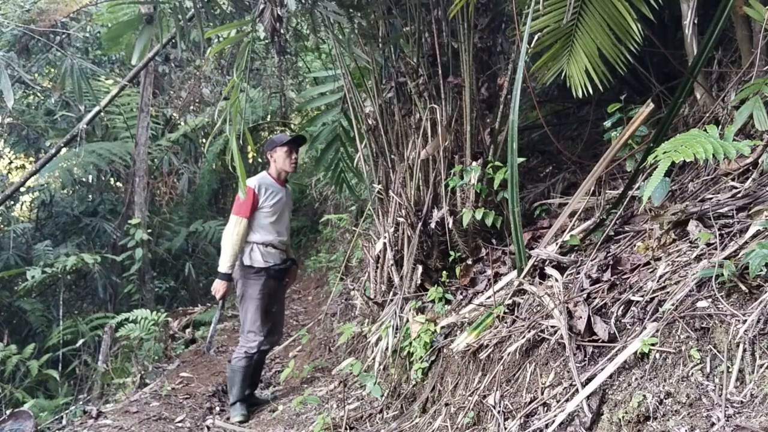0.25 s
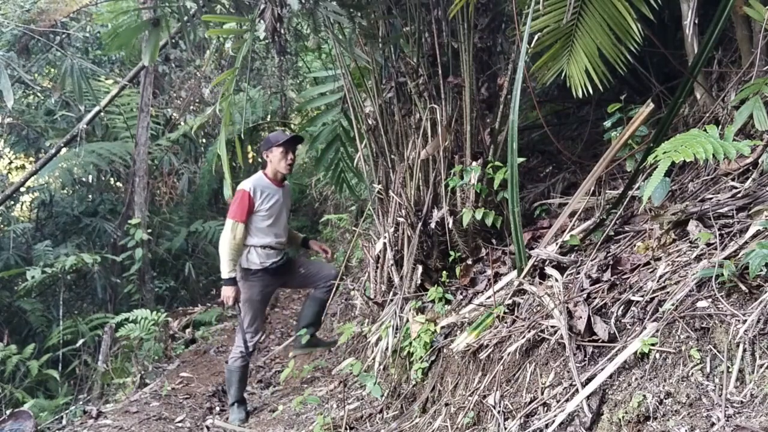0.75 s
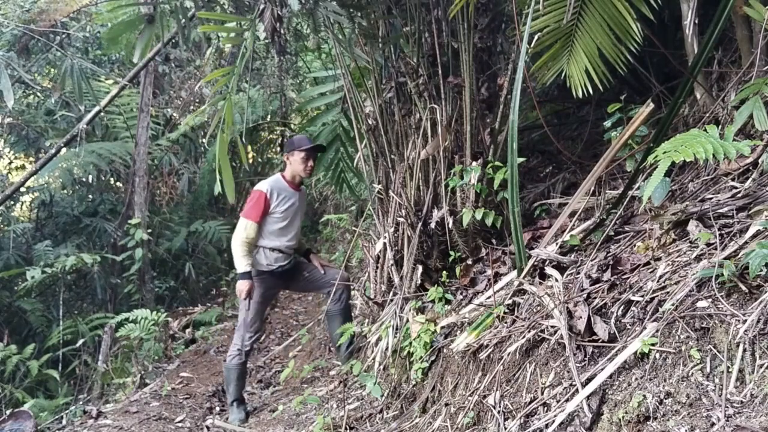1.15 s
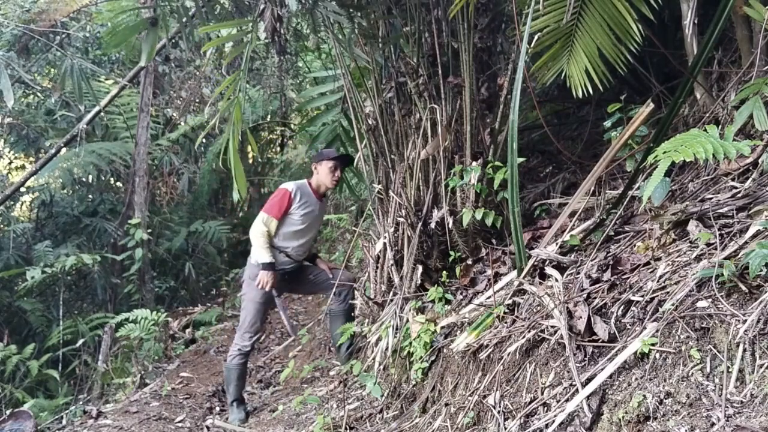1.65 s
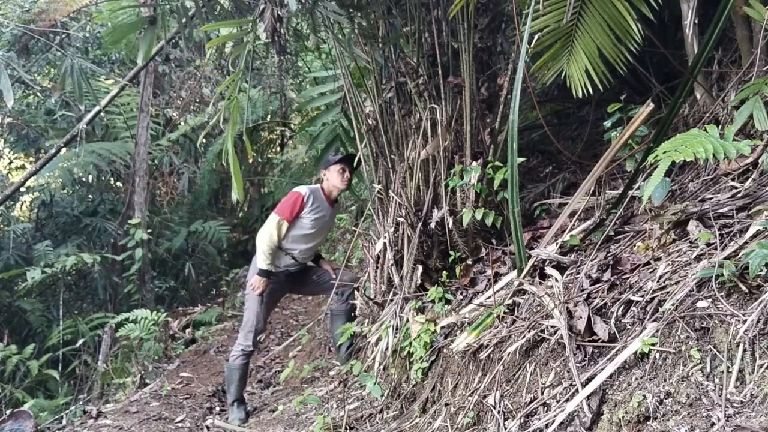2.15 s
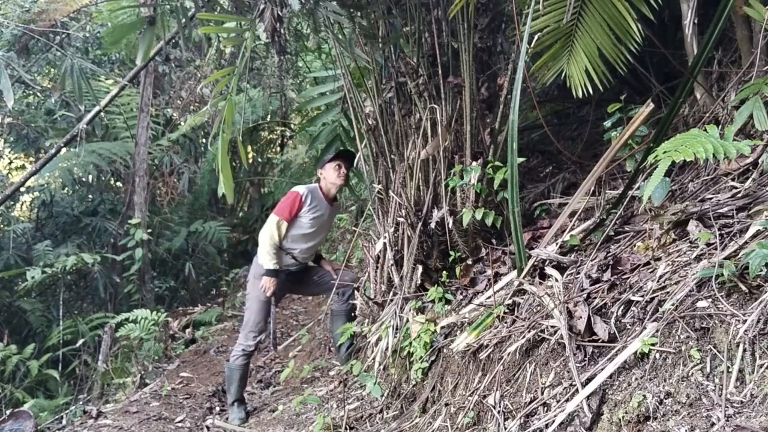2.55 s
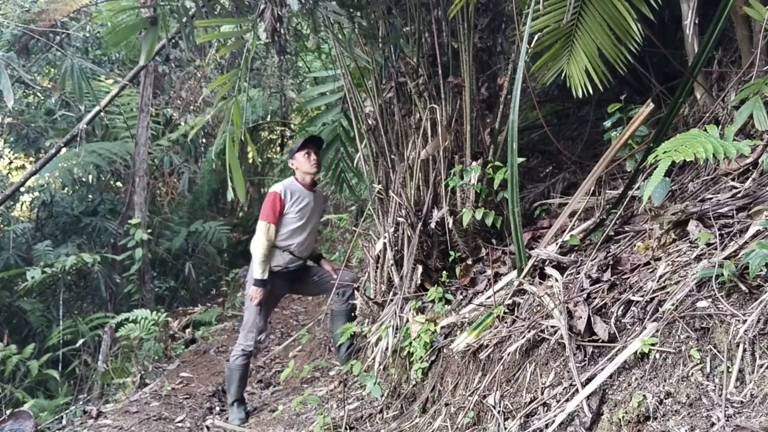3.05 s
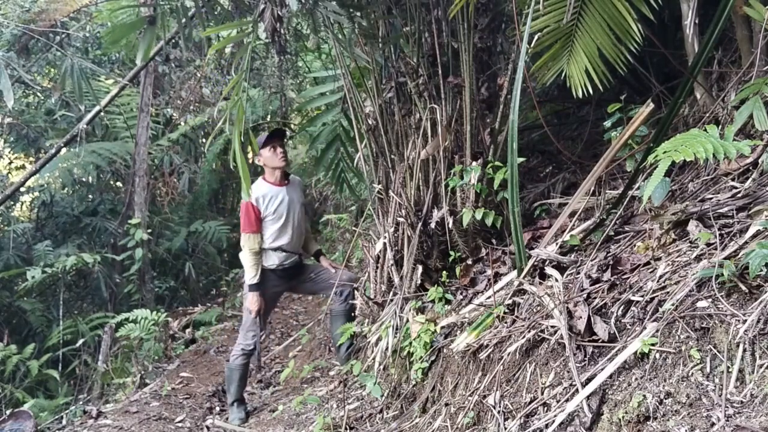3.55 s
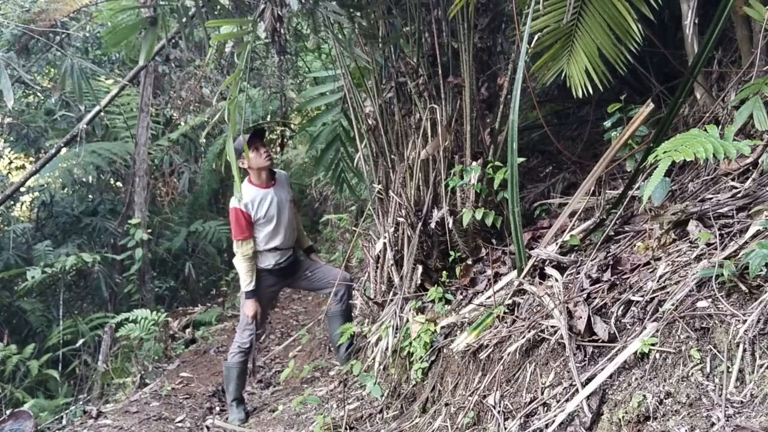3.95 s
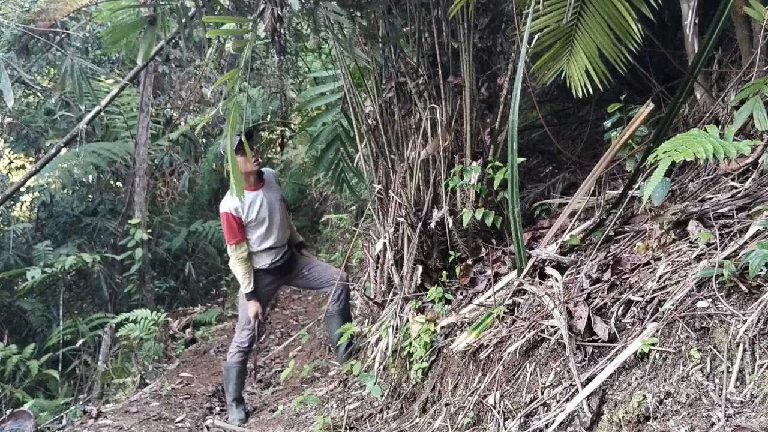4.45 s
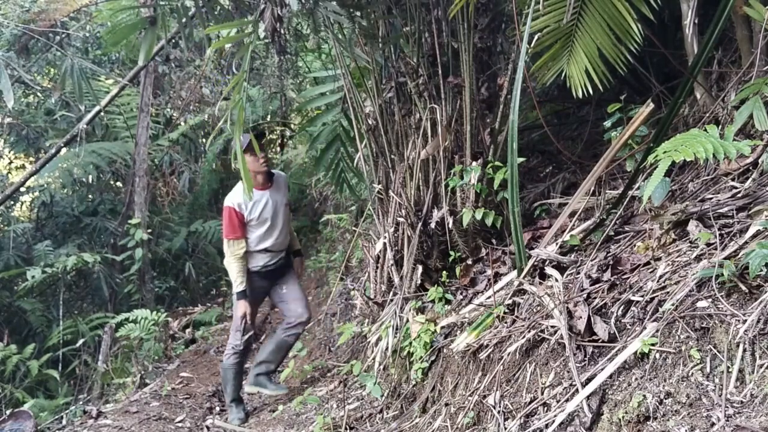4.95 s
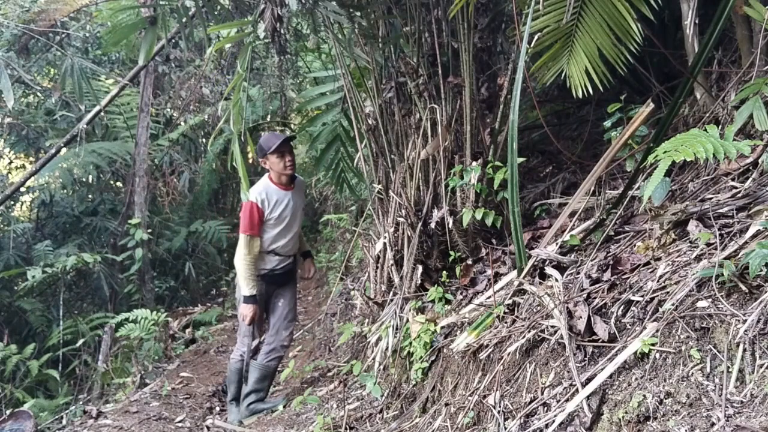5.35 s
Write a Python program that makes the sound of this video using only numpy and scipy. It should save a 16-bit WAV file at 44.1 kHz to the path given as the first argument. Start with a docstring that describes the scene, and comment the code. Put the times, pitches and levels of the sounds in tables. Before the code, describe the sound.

Shrill cicadas fill a forest while one whines up and drones every two seconds; a boot crunches sharply through dry leaves and cane.

```python
"""Close snaps and rustles come first, over a high chorus: a few metres away someone steps up onto dry leaves and cane.
On this forest slope one cicada hums and swells into a rising whine about every two seconds; later come the steps down.
Cicadas are harmonics of a moving tymbal rate, the chorus noise bands and tones, the litter filtered grains and bursts.
Trunks scatter the cicada, steps and small callers as noise echoes; light air rumbles on the microphone."""
import sys
import numpy as np
from scipy import signal
from scipy.fft import rfft, irfft
from scipy.io import wavfile

SR = 44100
rng = np.random.default_rng(int(sys.argv[2]) if len(sys.argv) > 2 else 0)


def inscribe(sig):
    """Save sig as 16-bit PCM at rate SR to the path in sys.argv[1].

    A 1-D sig is mono; a 2-D sig holds one channel per row.
    Samples are clipped to [-1, 1] before scaling.
    """
    pcm = np.round(np.clip(np.atleast_2d(sig).T, -1, 1) * 32767)
    wavfile.write(sys.argv[1], SR, pcm.astype(np.int16))


N = 247842

# cicada phrases: [start t/s, whine length/s, end t/s, whine level/dB before its swell,
# level/dB as the closing drone starts, drone swell/(dB per s)]
CICADA_PHRASES = [(0.716, .41, 1.53, -56, -69.5, 0), (2.801, .42, 3.76, -56, -68.5, 15),
                  (4.929, .44, 5.8, -55.5, -61, -22)]
# broad shrill of the chorus, before a fixed lift: [t/s, level/dB]
SHRILL_LEVEL = [(0.0, -60), (0.95, -62), (1.28, -57), (1.99, -61), (2.49, -60), (5.62, -60)]
# far, high hiss of small insects, before a fixed lift: [t/s, level/dB]
SIZZLE_LEVEL = [(0.0, -63.5), (0.51, -55.5), (0.81, -65), (1.09, -61), (3.87, -69.5), (5.62, -64.5)]
# centres of tiny high chirps: [t/s]
CHIRP_TIMES = [2.08, 2.4, 3.043, 3.622, 3.92, 4.29, 4.555, 5.07, 5.38]
# two quick higher pips and a later one, centres: [t/s]
PIP_TIMES = [4.781, 4.799, 5.2]
# bouts of a second cicada's whistle, before a fixed trim: [start t/s, end t/s, level/dB]
WHISTLE_BOUTS = [(-.2, 0.487, -55.5), (0.88, 1.55, -57), (2.194, 2.94, -54.5), (3.625, 4.21, -55.5),
                 (5.02, 5.7, -55)]
# dry leaves pressed or brushed: [peak t/s, fall/s, level/dB, tilt/(dB per octave), leaf ring f/Hz, ring level/dB]
LEAF_PUSHES = [(.039, 0.023, -49, -1.5, 8150, -9), (.14, 0.63, -58, 13, 9400, -27),
               (.22, .06, -57.5, -6.5, 2980, -21), (.315, 0.036, -47, -2.5, 9300, -19),
               (.346, 0.019, -44, -5, 4230, -14), (.483, 0.031, -53.5, -8, 4130, -3),
               (.555, 0.025, -49, -4.5, 3870, -2), (.618, 0.044, -52, -2.5, 8300, -7),
               (0.676, .02, -43.5, -4, 2830, -26), (.992, 0.02, -53.5, 1, 9300, -5),
               (1.048, 0.034, -49, -7.5, 9160, -7), (1.102, 0.028, -28, -1.5, 8180, -32),
               (1.125, 0.032, -27, -2, 3440, -24), (1.178, .024, -34.5, -0.5, 8600, -12),
               (1.221, 0.016, -39.5, 2, 9550, -6), (4.615, 0.039, -48.5, 3.5, 9500, -1),
               (4.645, 0.024, -45.5, 1, 9050, -7), (4.672, 0.026, -45.5, 0, 9200, -9),
               (4.743, 0.024, -46.5, 2.5, 9300, -7), (4.77, 0.025, -51.5, 1.5, 6300, -12),
               (5.22, 0.067, -59, 7, 9000, -13), (5.579, 0.082, -55, -3, 6300, -16)]
# stems and twigs snapping: [t/s, tearing time/s, level/dB, tilt/(dB per octave)]
STEM_SNAPS = [(.0325, 0.00041, -16.5, 7.5), (.3039, .001, -32, 17), (0.3274, 0.0011, -36, 8),
              (0.3418, 0.00049, -39, -9), (.5458, 0.00051, -43, -4), (.588, .001, -42, -4),
              (0.606, .0005, -51, 3), (1.1334, 0.001, -12.5, 4), (1.1352, 0.0015, -14.5, 2.5),
              (1.148, .0003, -19, 3), (1.2106, .0004, -20.5, 1), (1.2264, 0.00067, -27, 2),
              (1.231, 0.00036, -22.5, 1.5), (1.2679, .0006, -28.5, -1), (1.434, 0.00064, -36.5, -3),
              (1.507, .0005, -41, 1), (1.527, .0006, -33.5, 15), (1.721, 0.00054, -34, -3.5),
              (1.916, 0.0021, -48, -1), (2.871, 0.0009, -43, 5), (3.022, .0006, -42.5, 2),
              (4.156, .002, -53, 2), (4.1742, 0.00068, -36.5, 5), (4.583, 0.00055, -31, 8),
              (4.5885, 0.00059, -43, 9), (4.612, .0006, -41, 2), (5.195, .0008, -42, 12)]
# boot on the soil: [t/s, decay/s, level/dB, tilt/(dB per octave)]
SOIL_BLOWS = [(.032, 0.0026, -34.5, 5), (.965, 0.084, -54.5, -5), (1.091, 0.023, -41, 2.5),
              (1.101, 0.011, -32, -6), (1.19, 0.037, -46.5, -17), (4.73, 0.035, -60, 6.5),
              (4.975, 0.016, -56, -1), (5.193, 0.013, -48.5, 4.5)]
# knocks on hollow cane: [t/s, decay/s, level/dB, tilt/(dB per octave)]
CANE_KNOCKS = [(.668, 0.011, -50, 0), (1.133, 0.0073, -37, 0)]
# resonances of the soil, width of one filter pass: [f/Hz, width/Hz, level/dB]
SOIL_MODES = [(72, 59, -9), (154.6, 86, -1), (224, 137, 2), (320, 82, -1.5), (437, 130, -0.5),
              (554, 120, -9.5), (950, 300, -25)]
# resonance of the cane, width of one filter pass: [f/Hz, width/Hz, level/dB]
CANE_MODES = [(1555, 230, 0)]
# spectrum of cracking leaves: [f/Hz, level/dB]
LEAF_SPECTRUM = [(300, -17), (800, -32), (1100, -16.5), (1300, -32), (1550, -16.5), (2150, -18), (3000, -8),
                 (5400, -6.5), (8000, -1.5), (10100, -1.5), (12000, -5.5), (15500, -8)]
# spectrum of tearing stems: [f/Hz, level/dB]
STEM_SPECTRUM = [(600, -36), (1500, -22), (2300, -27), (3200, -7.5), (5400, -11), (8200, -3), (10200, -0.5),
                 (12000, -10), (15500, -12.5)]
# spectrum of the air rumble: [f/Hz, level/dB]
AIR_SPECTRUM = [(12, -10), (28, 0.5), (64, -9.5), (130, -16), (240, -21), (340, -30), (550, -35),
                (800, -39), (1400, -43.5), (1800, -40), (2400, -46.5), (3600, -46.5), (15000, -85)]
# spectrum of the shrill: [f/Hz, level/dB]
SHRILL_SPECTRUM = [(3600, -85), (4100, -18), (4400, -6), (4800, -1), (5150, 2), (5500, -2.5), (5750, -10.5),
                   (6500, -13), (8000, -46)]
# spectrum of the sizzle: [f/Hz, level/dB]
SIZZLE_SPECTRUM = [(4000, -24), (6000, 1), (6800, -4), (7650, 3), (8400, -3), (10400, 1.5), (11400, -12.5),
                   (15000, -9)]
# odd harmonics of the tymbal cycle on which the body sings: [harmonic number]
SONG_HARMONICS = [17, 19, 21, 23]
# those harmonics in the whine: [level/dB]
WHINE_MIX = [-33, -28, -0.5, -29]
# those harmonics in the drone: [level/dB]
DRONE_MIX = [-10, -1, -11, -18]
# high harmonics that make the buzz: [harmonic number]
HIGH_HARMONICS = [32, 36, 40, 42, 43, 44, 45, 47, 49, 53, 57]
# those harmonics in the buzz: [level/dB]
BUZZ_MIX = [-9, -2.5, -4, -7, -10, -5, -1, -2, -11, -16, -16]

FOREST_T60_S = 0.77
TOP_HZ = 15700
TIME = np.arange(N) / SR
# Attack, release, stop, return, relax, recover and stretch times are exponential time constants.
# The tymbal starts slow, nears full rate in the whine, then relaxes and tires during the drone.
TYMBAL_HZ, SAG_HZ, RECOVER_S = 139.55, 26.95, .09
RELAX_HZ, RELAX_S, TIRING_HZ_PER_S = 1.9, 0.0205, 3
# Cicada levels stand before the echoes and a -0.5 dB trim of the whole song.
# The opening scrape climbs from the hum as the abdomen stretches.
SCRAPE_HZ, SCRAPE_DB, SCRAPE_S, STRETCH_S = 2770, -64, 0.052, 0.066
WHINE_DELAY_S, WHINE_ATTACK_S, WHINE_RELEASE_S = 0.033, 0.022, 0.038
WHINE_SWELL_DB_PER_S = 27
# Drone and buzz close the phrase; a soft hum returns in the pause.
DRONE_DELAY_S, DRONE_ATTACK_S, DRONE_RELEASE_S, ONSET_DRONE_DB = 0.48, 0.021, 0.0079, -67.5
BUZZ_END_S, BUZZ_ATTACK_S, BUZZ_RELEASE_S, BUZZ_DB = 0.79, 0.04, 0.1, -61.5
HUM_HZ, HUM_DB, HUM_STOP_S, HUM_RETURN_S = 1731, -70.8, .02, 0.45
# Bouts are (start s, end s, attack s, release s).
# The drone's surge fades from before its start, so only a trace of it is left.
SURGE_BOUT, SURGE_DB = (3.59, 3.3, .02, .05), 10
WHISTLE_ATTACK_S, WHISTLE_RELEASE_S, WHISTLE_REST_DB = 0.023, 0.2, -82
# A throbbing insect has one bout above its faint resting level.
THROB_BOUT, THROB_DB, THROB_REST_DB = (2.08, 3.68, 0.15, 0.14), -64, -72
# A faint, thin insect note soon stops; the width is that of one filter pass.
THIN_BOUT, THIN_HZ, THIN_WIDTH_HZ, THIN_DB = (-0.066, 0.74, 0.017, 0.014), 4250, 430, -62.5
# Chirp and pip lengths run from the centre to 1/e.
CHIRP_HZ, CHIRP_DB, CHIRP_S = 6930, -68, .028
PIP_HZ, PIP_DB, PIP_S = 7420, -57.5, 0.0042
RISE_SHARE = .55  # rise time of a push on the leaves, as a share of its fall time


def cicada(jitter=.0012, stumble=.017, rasp_db=5, grain_db=1.2, scrape_width_hz=480,
           hum_wander_hz=19, hum_waver_db=2.4, overtone_db=-12):
    """The tymbal's harmonics sing as whine, drone and buzz; a hoarse scrape leads up to them from the resting hum."""
    rate, stretch, scrape_gain, whine_gain, drone_gain, buzz_gain, rest = phrasing()
    # the further the tymbal falls below its relaxed rate, the more it stumbles and rasps
    slack = np.sqrt(np.clip((TYMBAL_HZ - RELAX_HZ - rate) / SAG_HZ, 0, 1))
    rate = rate * (1 + jitter * walk(150) + stumble * slack * walk(200))

    rasp = amp((grain_db + rasp_db * slack) * walk(110))
    whine = partials(rate, SONG_HARMONICS, WHINE_MIX, waver_db=1.5) * whine_gain * rasp
    grain = amp(grain_db * walk(110))
    drone = partials(rate, SONG_HARMONICS, DRONE_MIX, waver_db=2.2) * drone_gain * grain
    buzz = partials(rate, HIGH_HARMONICS, BUZZ_MIX, waver_db=1.0) * buzz_gain

    scrape_hz = HUM_HZ + (SCRAPE_HZ - HUM_HZ) * stretch
    scrape = unit(sweep(rng.standard_normal(N), scrape_hz, scrape_width_hz)) * amp(SCRAPE_DB) * scrape_gain

    hum_hz = HUM_HZ + hum_wander_hz * walk(140)
    hum_tones = tone(hum_hz) + amp(overtone_db) * tone(2 * hum_hz)
    hum = hum_tones * amp(HUM_DB + hum_waver_db * walk(70)) * rest

    song = (whine + drone + buzz + scrape + hum) * amp(-.5)
    heard = from_left(song, lag_s=0.00038) + swaying(song, echo_db=-8, sway_s=.00006)
    return place(forest(heard, wet_db=-7.5, t60_s=FOREST_T60_S), pan_db=4.5)


def phrasing(onset_attack_s=0.035, onset_drone_s=0.2, onset_fade_s=0.053, scrape_attack_s=0.014, scrape_fade_s=0.072):
    """The tymbal scrapes into motion and speeds up, the whine swells, then drone and buzz take over."""
    rate = np.full(N, 1. * TYMBAL_HZ)
    stretch, scrape, whine, drone, buzz, hush = np.zeros((6, N))
    for start, whine_s, end, whine_db, drone_db, drone_swell_db in CICADA_PHRASES:
        age = np.maximum(TIME - start, 0)
        tired = np.clip(age - DRONE_DELAY_S, 0, 1)
        sag = SAG_HZ * np.exp(-age / RECOVER_S)
        relaxing = RELAX_HZ * (1 - np.exp(-tired / RELAX_S))
        speed = TYMBAL_HZ - sag - relaxing - TIRING_HZ_PER_S * tired
        rate = np.where(age > 0, speed, rate)
        stretch = np.where(age > 0, 1 - np.exp(-age / STRETCH_S), stretch)
        scrape += bout(start, start + SCRAPE_S, scrape_attack_s, scrape_fade_s)
        hush += bout(start, end, HUM_STOP_S, HUM_RETURN_S)

        swell = amp(whine_db + WHINE_SWELL_DB_PER_S * np.minimum(age, whine_s))
        whine += swell * bout(start + WHINE_DELAY_S, start + whine_s, WHINE_ATTACK_S, WHINE_RELEASE_S)

        # a first short drone under the whine, then the closing one
        onset = bout(start + WHINE_DELAY_S, start + onset_drone_s, onset_attack_s, onset_fade_s)
        drone += amp(ONSET_DRONE_DB) * onset
        closing = amp(drone_db + drone_swell_db * (np.minimum(age, end - start) - DRONE_DELAY_S))
        drone += closing * bout(start + DRONE_DELAY_S, end, DRONE_ATTACK_S, DRONE_RELEASE_S)
        buzz += amp(BUZZ_DB) * bout(start + DRONE_DELAY_S, start + BUZZ_END_S, BUZZ_ATTACK_S, BUZZ_RELEASE_S)
    drone *= 1 + (amp(SURGE_DB) - 1) * bout(*SURGE_BOUT)
    return rate, stretch, scrape, whine, drone, buzz, 1 - hush


def partials(rate, harmonics, levels_db, waver_db):
    """Harmonics of the tymbal cycle, each wavering a little on its own."""
    return sum(tone(k * rate) * amp(db + waver_db * walk(22.25)) for k, db in zip(harmonics, levels_db))


def rustles(grain_db=2.0, grains_per_s=12000, firm_db=-30, crowding=.55, spread=1.0, clump_db=1.0,
            ring_width=0.29, size=32000):
    """Each push breaks a swarm of tiny leaf cracks and one leaf rings with them; a light push breaks fewer."""
    out = np.zeros((2, N))
    for s, fall, db, tilt_db, ring_hz, ring_db in LEAF_PUSHES:
        rise = RISE_SHARE * fall
        start = max(s - 3 * rise, 0)
        t = TIME[:size] + start - s
        density = grains_per_s * amp(crowding * (db - firm_db))
        cracked = rng.random(size) < density / SR
        strength = amp(grain_db * np.minimum(rng.exponential(size=size), 4.5))
        grains = cracked * rng.choice([-1, 1], size) * strength
        grains = grains * (1 + spread * rng.standard_normal((2, size)))  # unlike at the two microphones
        push = np.where(t < 0, np.exp(-(t / rise) ** 2), np.exp(-np.abs(t) / fall))
        ring = unit(resonate(grains, ring_hz, ring_width * ring_hz))
        leaves = unit(colour(grains, LEAF_SPECTRUM, tilt_db)) + amp(ring_db) * ring
        add(out, start, unit(leaves) * push * amp(db))
    return out * amp(clump_db * walk(260))  # the level clumps at random


def snaps(ring_s=0.023, ring_db=-25, spread=0.94, size=4096):
    """Fibres part within about a millisecond and leave the stem quivering as a faint noise tail."""
    out = np.zeros((2, N))
    t = TIME[:size] - TIME[size // 16]  # a short lead-in leaves room for the filter
    for s, tear_s, db, tilt_db in STEM_SNAPS:
        quiver = amp(ring_db) * np.exp(-np.abs(t) / ring_s)
        tear = (t >= 0) * (np.exp(-np.abs(t) / tear_s) + quiver)
        fibres = (rng.standard_normal(size) + spread * rng.standard_normal((2, size))) * tear
        snap = unit(colour(fibres, STEM_SPECTRUM, tilt_db)) * np.sqrt(np.mean(tear ** 2))
        add(out, s + t[0], snap * amp(db))
    return out


def thuds(blows, modes, size=12000):
    """Soil or hollow cane answers the boot with damped modes; a negative tilt favours the low ones."""
    out, t = np.zeros(N), TIME[:size]
    for s, decay_s, db, tilt_db in blows:
        fade = np.exp(-t / decay_s)
        push = rng.standard_normal(size) * fade
        knock = 0
        for hz, width_hz, mode_db in modes:
            knock = knock + unit(resonate(push, hz, width_hz)) * amp(mode_db + tilt_db * np.log2(hz))
        add(out, s, unit(knock) * np.sqrt(np.mean(fade ** 2)) * amp(db))
    return out


def chorus(throb_hz=29, throb_pitch_hz=5130, whistle_hz=5585, flutter_hz=113, undertone_db=-6,
           shrill_db=1.7, sizzle_db=2.5):
    """Far cicadas merge into a shrill noise band; one whistles, one throbs, a thin note stops, small insects sizzle."""
    shrill_level_db = curve(SHRILL_LEVEL) + shrill_db + 1.1 * walk(25.12)
    shrill = unit(colour(stereo_noise(), SHRILL_SPECTRUM)) * amp(shrill_level_db)

    # the throb is a train of short, nearly pure pips
    throb_rate = throb_hz * (1 + 0.014 * walk(2.73))
    throb = (1 + np.cos(2 * np.pi * np.cumsum(throb_rate) / SR)) ** 3
    throb_gain = amp(THROB_REST_DB) + amp(THROB_DB) * bout(*THROB_BOUT)
    pulser = unit(throb * tone(throb_pitch_hz + 70 * walk(300))) * throb_gain
    pulser = forest(pulser, wet_db=-7, t60_s=FOREST_T60_S)

    # the whistle flutters against a weaker tone just below it
    effort = amp(WHISTLE_REST_DB)
    for start, end, db in WHISTLE_BOUTS:
        effort = effort + amp(db) * bout(start, end, WHISTLE_ATTACK_S, WHISTLE_RELEASE_S)
    pitch = whistle_hz + 10 * walk(4) + 28 * walk(120)
    whistle = tone(pitch) + amp(undertone_db) * tone(pitch - flutter_hz)
    whistle = unit(whistle + swaying(whistle, echo_db=3.5, sway_s=.00008, count=2))
    whistle = whistle * effort * amp(-3.8 + 2.5 * walk(30))

    sizzle_level_db = curve(SIZZLE_LEVEL) + sizzle_db + 0.85 * walk(30)
    sizzle = unit(colour(stereo_noise(likeness=0.026), SIZZLE_SPECTRUM)) * amp(sizzle_level_db)
    thin = unit(resonate(stereo_noise(), THIN_HZ, THIN_WIDTH_HZ)) * amp(THIN_DB) * bout(*THIN_BOUT)
    return shrill + pulser + whistle + thin + place(sizzle, pan_db=-1.2)


def chirps(times, hz, level_db, length_s, size=8192):
    """Brief, thin chirps from far off: narrow noise under a bell-shaped envelope."""
    out, t = np.zeros(N), TIME[:size] - size / SR / 2
    for s in times:
        note = unit(resonate(rng.standard_normal(size), hz, 150))
        add(out, s + t[0], note * amp(level_db) * np.exp(-(t / length_s) ** 2))
    return forest(out, wet_db=-6, t60_s=FOREST_T60_S)


def air(level_db=-49.5):
    """Light air and the far valley: low noise whose level wavers."""
    rumble = unit(colour(stereo_noise(likeness=0.22), AIR_SPECTRUM))
    return place(rumble * amp(level_db + 0.39 * walk(2.43) + 1.0 * walk(14)), pan_db=4)


def forest(x, wet_db, t60_s):
    """Scattered echoes from trunks and foliage: decaying sparse noise, different at each microphone."""
    t = TIME[:SR]
    decay = np.exp(-np.log(1000) * t / t60_s)
    echoes = rng.standard_normal((2, SR)) ** 3 * decay * (t > .002)
    echoes /= np.sqrt(np.sum(echoes ** 2, axis=1, keepdims=True))
    return x + amp(wet_db) * signal.fftconvolve(np.atleast_2d(x), echoes, axes=1)[:, :N]


def swaying(x, echo_db, sway_s, count=5):
    """Echoes off moving foliage: path lengths keep changing, so steady tones beat and flutter at each microphone."""
    lags = rng.uniform(.004, .06, 2 * count)
    paths = [np.interp(TIME - lag - sway_s * walk(13), TIME, x) for lag in lags]
    return amp(echo_db) * np.reshape(paths, (2, count, N)).sum(axis=1) / np.sqrt(count)


def from_left(x, lag_s):
    """The right microphone hears it a little later."""
    return np.array([x, np.interp(TIME - lag_s, TIME, x)])


def place(x, pan_db):
    """Set the left-minus-right level."""
    return x * amp(np.array([[pan_db], [-pan_db]]) / 2)


def bout(start, end, attack_s, release_s):
    """An envelope: rises from start toward 1, and fades after end."""
    rise = 1 - np.exp(-np.maximum(TIME - start, 0) / attack_s)
    return rise * np.exp(-np.maximum(TIME - end, 0) / release_s)


def tone(hz):
    """A sine that follows a pitch; rms 1."""
    return np.sqrt(2) * np.sin(2 * np.pi * np.cumsum(hz) / SR)


def sweep(x, hz, width_hz):
    """A band filter whose centre may move every sample: shift down to 0 Hz, low-pass, shift back."""
    turn = np.exp(2j * np.pi * np.cumsum(hz) / SR)
    lowpass = signal.butter(2, width_hz / 2, fs=SR, output="sos")
    return np.real(turn * signal.sosfilt(lowpass, x / turn))


def resonate(x, hz, width_hz):
    """A resonance applied twice, for steep skirts."""
    b, a = signal.iirpeak(hz, hz / width_hz, fs=SR)
    return signal.lfilter(b, a, signal.lfilter(b, a, x))


def colour(x, points, tilt_db=0):
    """Filter by a spectrum, tilted about 8 kHz; the tilt levels off below 2 kHz."""
    octave = np.log2(np.maximum(np.fft.rfftfreq(x.shape[-1], 1 / SR), 1) / 8000)
    hz, db = np.transpose(points)
    gain_db = np.interp(octave, np.log2(hz / 8000), db, left=-90) + tilt_db * np.maximum(octave, -2)
    return irfft(rfft(x) * amp(gain_db), x.shape[-1])


def stereo_noise(likeness=0):
    """Two noises that share a part."""
    share = np.clip(likeness, 0, 1)
    return np.sqrt(share) * rng.standard_normal(N) + np.sqrt(1 - share) * rng.standard_normal((2, N))


def walk(rate):
    """Random levels joined by straight lines, rate of them a second; rms 1."""
    return unit(np.interp(TIME * rate, np.arange(4096), rng.standard_normal(4096)))


def curve(rows):
    """Each column of a table, joined by straight lines in time."""
    s, *columns = np.transpose(rows)
    return np.squeeze([np.interp(TIME, s, c) for c in columns])


def amp(db):
    """Decibels to gain."""
    return 10 ** (np.asarray(db) / 20)


def unit(x):
    """Scale to rms 1."""
    return x / np.sqrt(np.mean(x ** 2))


def add(out, s, x):
    """Mix a short sound in at time s."""
    i = max(int(s * SR), 0)
    out[..., i:i + x.shape[-1]] += x[..., :max(N - i, 0)]


def scene():
    """The cicada to the left, the steps nearly straight ahead, other insects all round."""
    boot = thuds(SOIL_BLOWS, SOIL_MODES) + thuds(CANE_KNOCKS, CANE_MODES)
    litter = place(rustles() + snaps(), pan_db=-0.5)
    steps = forest(litter + boot, wet_db=-6.0, t60_s=0.23)
    callers = chirps(CHIRP_TIMES, CHIRP_HZ, CHIRP_DB, CHIRP_S) + chirps(PIP_TIMES, PIP_HZ, PIP_DB, PIP_S)
    return cicada() + steps + chorus() + callers + air()


def record(dry):
    """The recorder cuts the top with a steep low-pass."""
    return signal.sosfilt(signal.ellip(10, .2, 80, TOP_HZ, fs=SR, output="sos"), dry)


dry = scene()
out = record(dry)
inscribe(out)
```